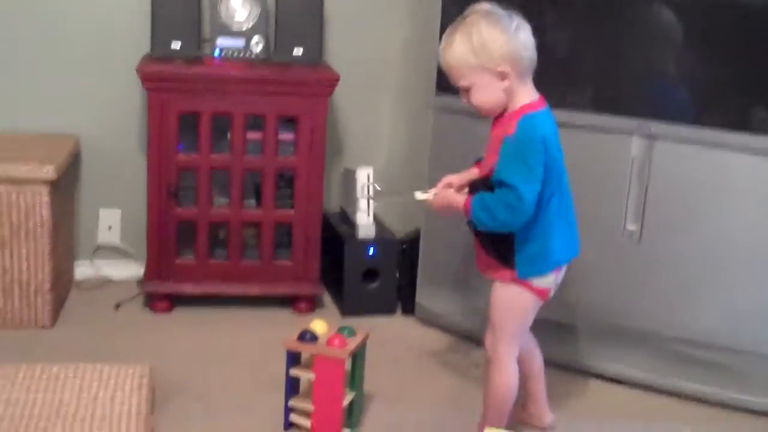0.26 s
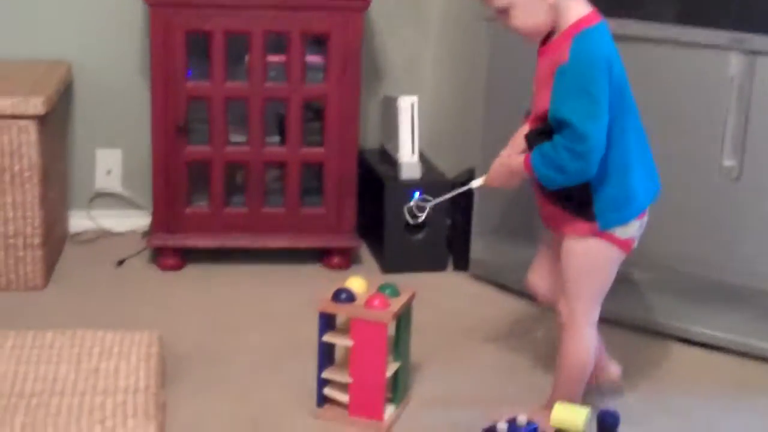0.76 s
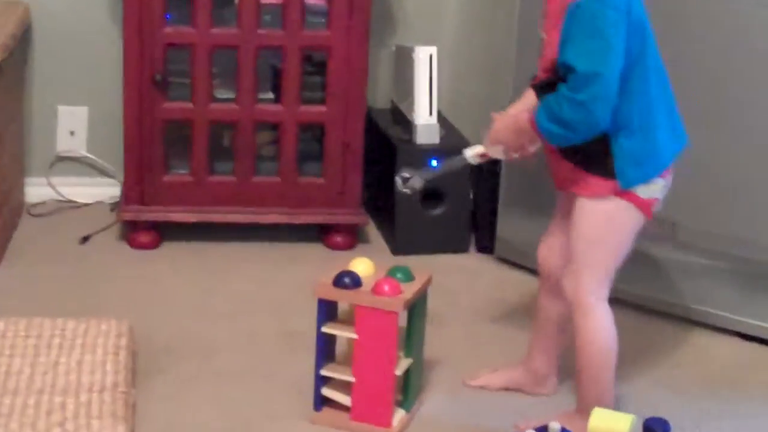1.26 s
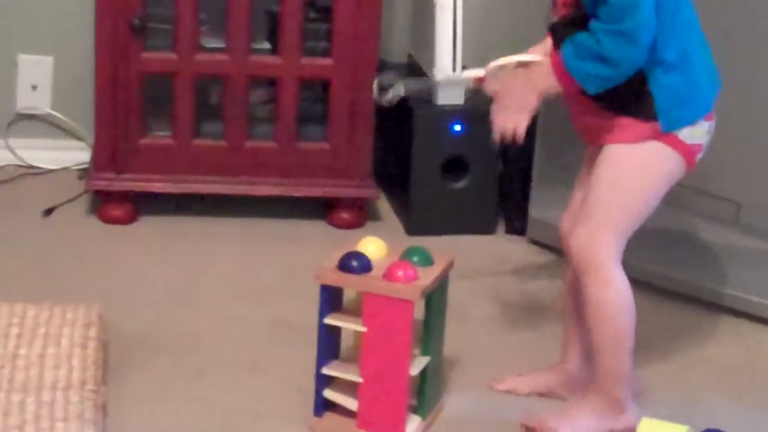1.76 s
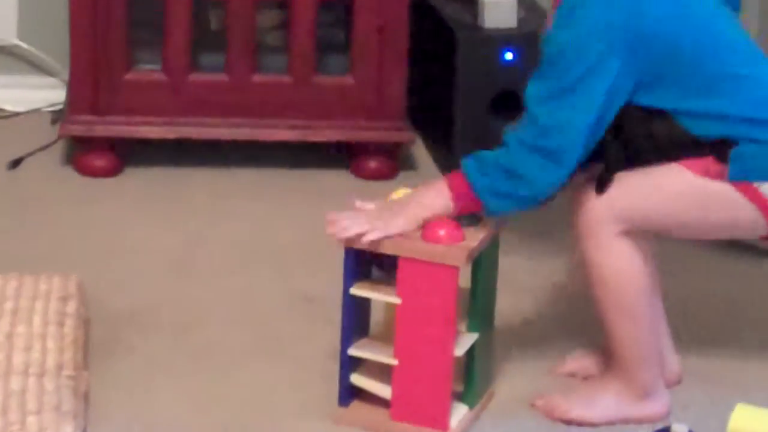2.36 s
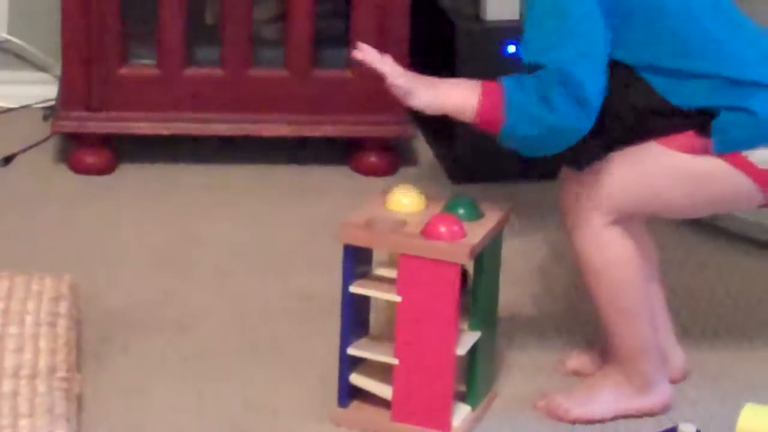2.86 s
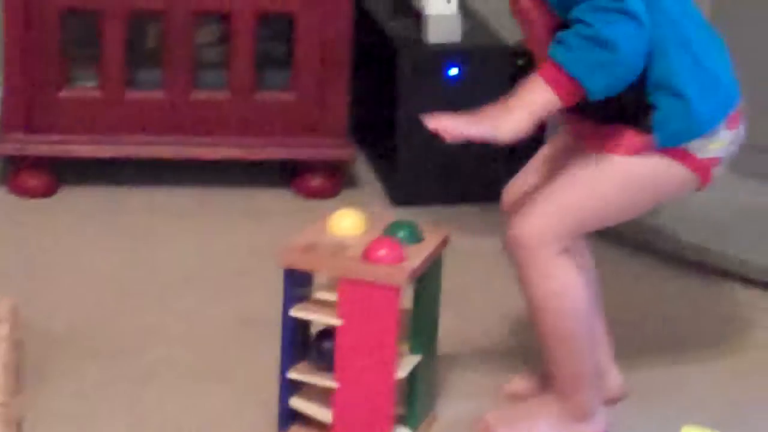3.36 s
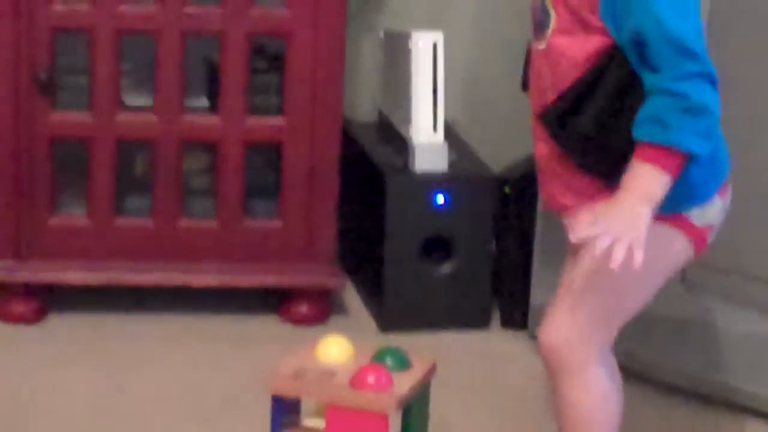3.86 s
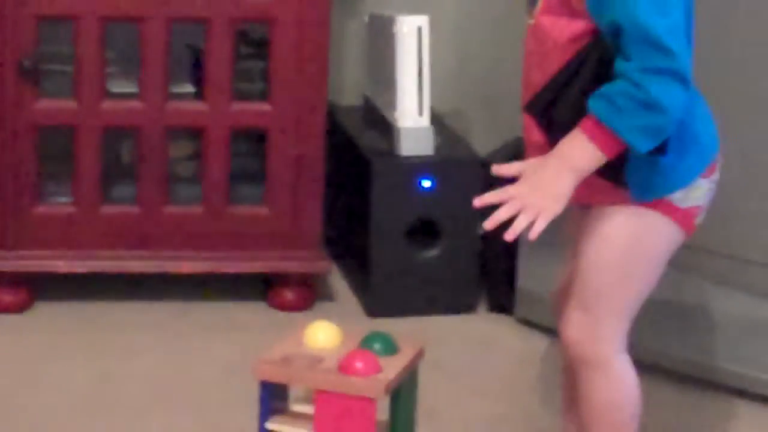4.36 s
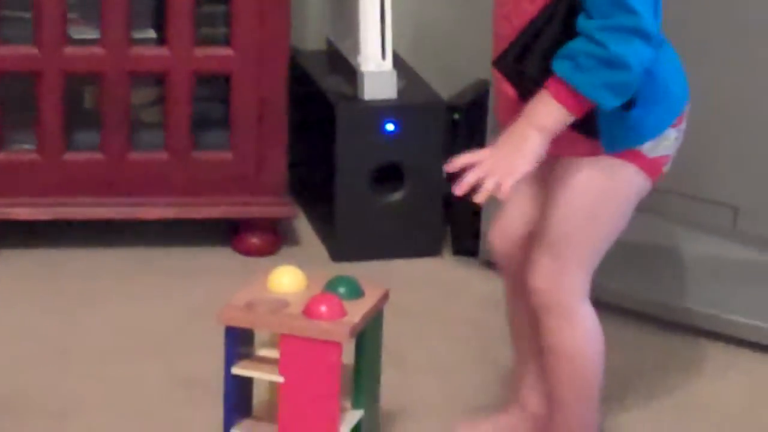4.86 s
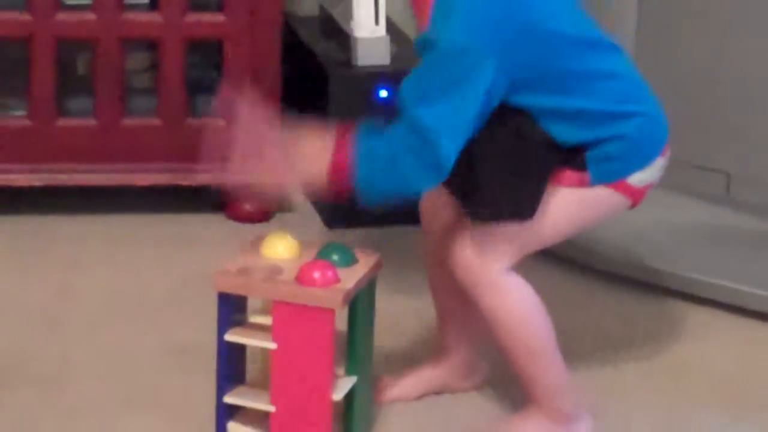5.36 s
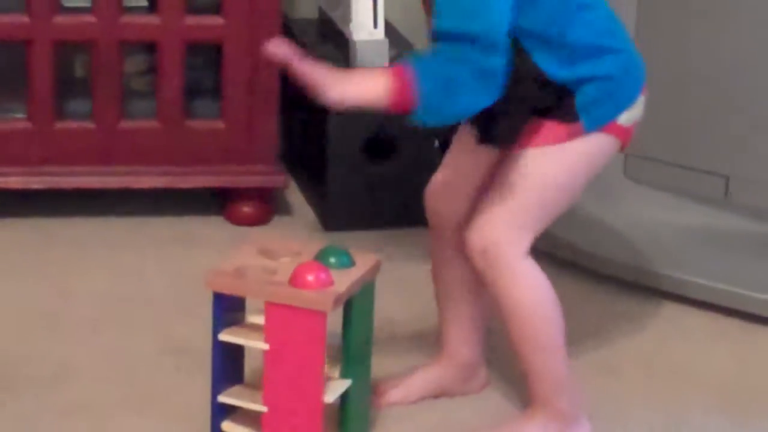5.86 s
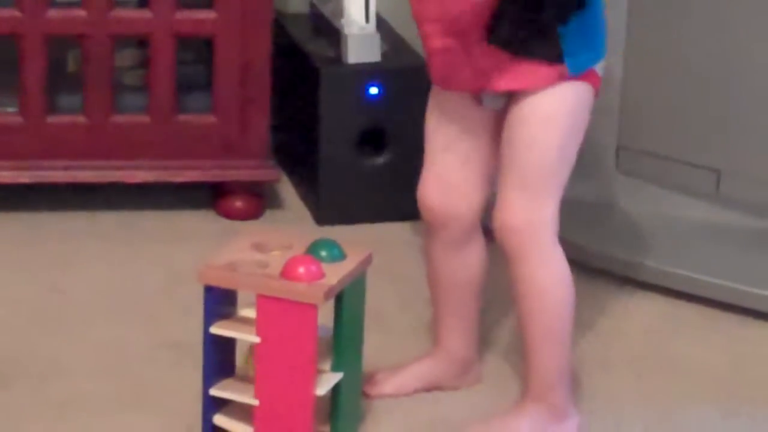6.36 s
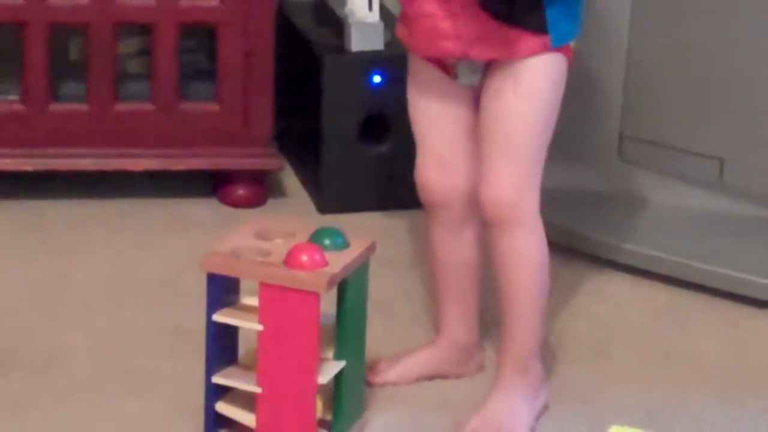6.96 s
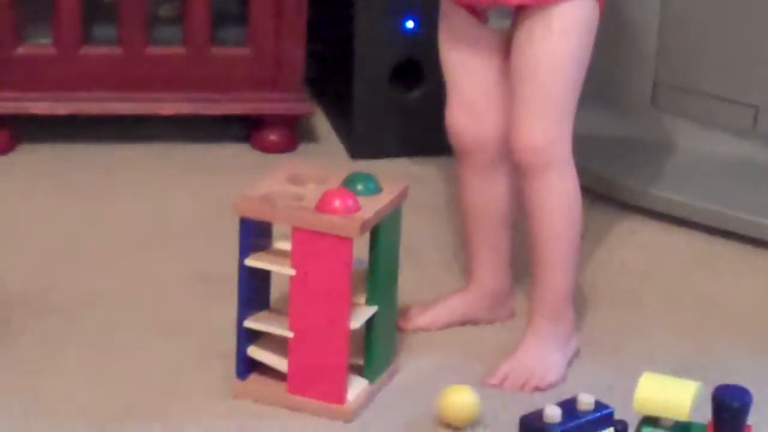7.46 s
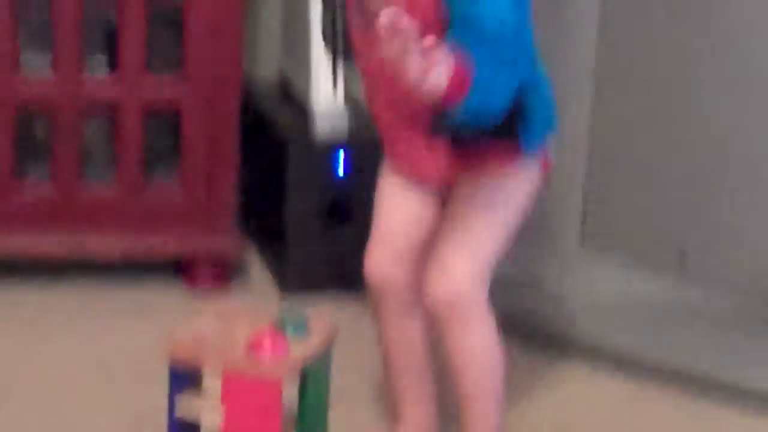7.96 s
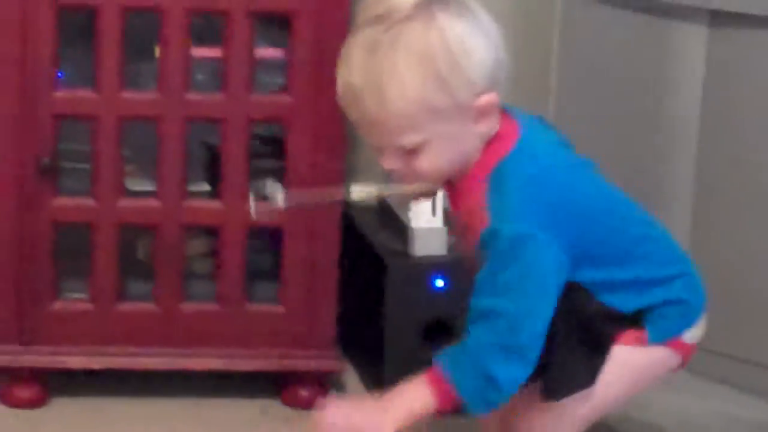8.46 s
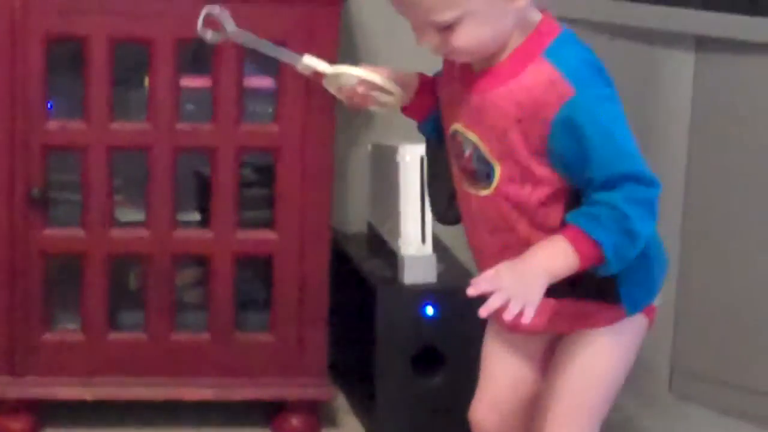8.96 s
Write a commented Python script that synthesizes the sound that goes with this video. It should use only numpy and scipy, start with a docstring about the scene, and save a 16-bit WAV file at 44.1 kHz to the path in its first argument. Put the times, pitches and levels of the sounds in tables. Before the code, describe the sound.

Quiet indoor noise and a small bright tong click open the scene. A loud hollow slap on wood follows, with dry wooden knocks, short rolls and clacks stepping down inside a small toy tower. Silence, then the same again, knocking at fairly regular steps. A last slap overlaps a metallic snap and trails off in light clacks. Close-to-mid handheld microphone, low bumps, short lively room ring.

```python
"""Over a soft background a small child in a living room snaps metal tongs, then slaps balls into a toy tower.
Each wooden ball knocks and bounces down the zigzag ramps inside, and the room rings briefly after it.
Tower and tongs are banks of decaying sines struck by rough clicks; small dull ticks make the balls roll.
Echoes and a banded noise tail make the room; shaped noise is the background, low sines are the bumps."""
import sys
import numpy as np
from scipy import signal
from scipy.fft import rfft, irfft
from scipy.io import wavfile

SR = 44100
rng = np.random.default_rng(int(sys.argv[2]) if len(sys.argv) > 2 else 0)


def wav_out(sig):
    """Save sig, one row per channel (or a flat mono array), as 16-bit PCM at SR to the path in sys.argv[1]."""
    wavfile.write(sys.argv[1], SR, np.round(np.clip(np.atleast_2d(sig).T, -1, 1) * 32767).astype(np.int16))


N = 406602

# ball and hand on the wooden tower, and near 7.86 s the ball bumping a toy on the carpet: # start_s [s],
# blow_db [dB], own_hz: pitch of the struck part [Hz], # then against the blow: thud_db of the frame, walls_db:
# clack of the side walls, # crack_db of the contact, own_db: the struck part's own ring [dB each]
KNOCKS = [(2.445, -23, 1550, -17, -6.5, -34, -15.5), (2.493, 5, 3010, -22.5, -1, -5, -25.5),
          (2.543, -2.5, 1670, -38.5, -3, -27, -19), (2.627, -7, 5730, -41, -12.5, -13.5, -14),
          (2.727, -17, 3200, -8, -12, -19, -7.5), (2.735, -14, 2000, -2.5, -13, -49, -6.5),
          (2.777, -31.5, 2030, -19, 2, -2, -6.5), (3.029, -6, 1790, -21, -4, -13.5, -17.5),
          (3.056, -22.5, 1980, 4.5, 8.5, -38, -18), (3.162, -48.5, 1160, -16, 12, -27, 11.5),
          (3.273, -11.5, 2780, -16, -12, -23, -5), (3.293, -14.5, 1110, -4.5, 0.5, -44, -32),
          (3.338, -19, 2280, 1.5, 1, -22, 5), (3.529, -3, 4770, -53.5, 4, -8.5, -9.5),
          (3.554, -23.5, 1065, 2, -12, -18, 7), (3.585, -6.5, 3660, -42, -6, -16, -11),
          (3.613, -23.5, 3820, -2, 13.5, -8, -4), (3.642, -28, 3320, -22, 5, -3, 14.5),
          (3.777, -16, 2080, -6.5, 2.5, -9, -6.5), (3.802, -10, 1080, -24, -7, -34, -6),
          (3.845, -24.5, 2080, -16, 4, -13.5, 0), (3.879, -16.5, 990, -36, 0, -14.5, -26),
          (4.083, -12.5, 1987, -57.5, 12, -1.5, 2), (4.111, -19.5, 1100, 0.5, -11, -12, -10.5),
          (4.133, -6.5, 2860, -23, -5.5, -20.5, -36), (4.332, -6.5, 2920, -14, -10, -17.5, 0),
          (4.356, -18, 1488, 1, -19, -30, 4), (4.397, -14.5, 1880, -42, 2, -12, -7.5),
          (4.413, -13, 2790, -7, -5, -26, -1.5), (5.554, -11.5, 1800, -8.5, -12, -13, -10),
          (5.592, 1.5, 3100, -15.5, 1, -3.5, -30.5), (5.638, -33, 3150, -3, 9, 4, -14),
          (5.678, -6, 4020, -14, 5, -19.5, -1), (5.777, -25, 1130, -12.5, 8.5, -11.5, 3),
          (5.834, -17, 2050, 1.5, -6, -50, 3.5), (5.863, -3.5, 2294, -40, -11, -12.5, -9),
          (5.995, -16.5, 2510, -8, -4.5, -14, 2.5), (6.014, -11.5, 1057, -7.5, -6, -25, -3.5),
          (6.062, -15.5, 1860, -22.5, -1, -23.5, -5), (6.292, -4.5, 1964, -49.5, 6.5, -8, -16),
          (6.319, -22.5, 1077, 1, -9, -25, 5.5), (6.353, -15, 1800, -42, 8, -7, -7),
          (6.386, -17.5, 3800, -28, 4.5, -8, -15), (6.411, -31.5, 3260, -17.5, 22, -7, 16),
          (6.547, -16, 2010, -10.5, 4, -9.5, -22), (6.572, -11.5, 1073, -5, -4, -18, -2),
          (6.608, -27.5, 2140, -25, 6.5, -18, 0), (6.653, -23.5, 2130, -18, -4.5, -20, -5),
          (6.831, -6.5, 2020, -44, 5, -8.5, -8), (6.859, -8, 1084, -9, -13.5, -7, -14.5),
          (6.888, -18.5, 3150, -18, 7, -7, -21), (6.914, -25, 3240, -22.5, 9, -19, 2),
          (7.125, -11, 2930, -16, -13, -19, -2), (7.137, -19.5, 1485, -24, -10, -40, 4.5),
          (7.148, -14.5, 1050, -4, -5.5, -21, -7), (7.189, -13, 1080, -21, 0.5, -16, -41),
          (7.856, -31, 2900, -18, -25, -58, -13), (7.885, -38, 2520, -13, -22, -58, -8),
          (8.411, -33.5, 2240, -43, -9, -11, -8), (8.421, -17, 2160, -9, -6, -11, -24),
          (8.448, -1.5, 2687, -7.5, 6.5, -7, -0.5), (8.47, -9, 3460, -5.5, 1, -4.5, 7.5),
          (8.558, -11, 2510, -54, -0.5, -4, -3), (8.666, -18, 2480, -7, -20, -60, 4.5),
          (8.787, -17, 3400, -5.5, 5, -13, -14), (8.819, -20, 3210, -17, 2, -15, -8),
          (8.976, -21, 3330, -9, 3, -8, -19), (9.005, -22, 1083, -5, -6, -23, -1),
          (9.027, -29.5, 2000, -4, 0, -20, -5), (9.08, -32, 3280, -21, -2.5, -20, -1.5)]


def from_db(db):
    """Gain of a level in dB."""
    return 10 ** (np.asarray(db) / 20)


def rms_one(x):
    """Scale a sound to unit power."""
    return x / np.sqrt(np.mean(x ** 2) + 1e-20)


def at_hz(table_hz, values, hz):
    """Read a curve drawn as straight lines on a log-frequency axis."""
    return np.interp(np.log(hz), np.log(table_hz), values)


def in_time(rows):
    """Draw a (time in s, value) curve at every sample."""
    return np.interp(np.arange(N) / SR, *np.transpose(rows))


def clicks(seconds, sizes):
    """Lay down one single-sample click for each blow."""
    train = np.full(N, 1e-18)  # a tiny offset keeps filters out of denormal numbers
    np.add.at(train, np.round(np.asarray(seconds) * SR).astype(int), sizes)
    return train


def place(seconds, shapes):
    """Lay down each blow's waveform at its time."""
    at = np.round(np.asarray(seconds) * SR).astype(int)[:, None] + np.arange(shapes.shape[1])
    return np.bincount(at.ravel(), shapes.ravel(), N + SR)[:N] + 1e-18


def ring(train, hz, t60):
    """Two-pole resonator: a unit click starts a decaying sine that loses 60 dB in t60 seconds."""
    radius = from_db(-60 / (t60 * SR))
    angle = 2 * np.pi * hz / SR
    return signal.lfilter([0, np.sin(angle)], [1, -2 * radius * np.cos(angle), radius * radius], train)


def chatter(rough, count):
    """Loose parts pass a click to and fro: three all-passes spread it in time but keep its colour."""
    longest_gap_s = 0.0014
    size = SR // 20
    first = 1 - np.reshape(rough, (-1, 1, 1))  # rough is the share that rebounds
    click = rfft(np.hanning(6)[1:-1] / 2.5, size)  # the blow takes a tenth of a millisecond
    gaps = longest_gap_s * SR * rng.uniform(.15, 1, (count, 3, 1))
    later = np.exp(-2j * np.pi * gaps.round() * np.arange(len(click)) / size)
    rebounds = (first - later) / (1 - first * later)
    return irfft(click * np.prod(rebounds, axis=1), size)


def bands(length, low_hz):
    """Third-octave bands of mid and side noise with their centre pitch."""
    edges = low_hz * 2 ** np.arange(0, np.log2(17000 / low_hz), 1 / 3)
    white = rng.standard_normal((2, 2, length))  # neighbouring bands use different noise
    for k, (low, high) in enumerate(zip(edges, edges[1:])):
        band = signal.butter(2, [low, high], "band", fs=SR, output="sos")
        yield np.sqrt(low * high), signal.sosfilt(band, white[k % 2])


def stereo(mid_side, alike):
    """Mix mid and side into left and right that agree by the given share."""
    alike = np.clip(alike, 0, 1)
    mid, side = mid_side
    return np.sqrt(1 + alike) * mid + np.sqrt(1 - alike) * side * [[1], [-1]]


def background():
    """Soft broad noise of the house and the microphone, built from bands; its level drifts."""
    # colour of the noise: band_hz [Hz], level_db [relative dB per Hz]
    colour = [(59, -35.5), (100, -12), (177, -2), (315, -1), (442, -6.5), (502, -5.5), (634, -14),
              (909, -7), (1250, -16.5), (5530, -21.5), (11100, -36), (13800, -45), (16000, -75)]
    # level over time, ahead of the left-right tilt: time_s [s], level_db [dB]
    drift = [(0.0, -50), (1.1, -49.5), (1.6, -54), (2.4, -53), (2.77, -55), (5.57, -53), (5.83, -57.5),
             (6.37, -54), (6.96, -57.5), (8.45, -55), (8.73, -67), (9.22, -63)]
    # left-right likeness: band_hz [Hz], alike [share 0-1]
    likeness = [(120, 1), (300, 0.98), (1000, 0.74), (4000, 0.069), (12000, 0.15)]
    hz, level_db = np.transpose(colour)
    like_hz, alike = np.transpose(likeness)
    noise = sum(from_db(at_hz(hz, level_db, f)) * stereo(pair, at_hz(like_hz, alike, f))
                for f, pair in bands(N, low_hz=92.5))
    tilt = from_db([[.8], [-.8]])  # a little stronger on the left
    return rms_one(noise) * from_db(in_time(drift)) * tilt


def rumble():
    """Lumpy low noise, its own at each microphone port; its level wanders through ten random points a second."""
    # level around which the lumps vary: time_s [s], level_db [dB]
    course = [(0.0, -53), (1.13, -61), (1.51, -66), (2.18, -54.5), (3.18, -70.5), (3.59, -59),
              (4.41, -67.5), (4.88, -58.5), (6.37, -49.5), (7.04, -65), (8.37, -60.5), (8.63, -62),
              (9.22, -67)]
    top_hz, lump_db = 93, 4.5
    band = signal.butter(3, [15, top_hz], "band", fs=SR, output="sos")
    low = signal.sosfilt(band, rng.standard_normal((2, N)))
    lumps = np.interp(np.arange(N) / SR * 10, np.arange(100), rng.standard_normal(100))
    return rms_one(low) * from_db(in_time(course) + lump_db * lumps)


def thumps():
    """Dull bumps on the microphone housing: decaying low sines, stronger on one side."""
    # start_s [s], level_db: mean of both sides' clicks [dB], pan_db: left over right [dB]
    bumps = [(1.889, -50, -29), (2.128, -49, -24), (4.773, -46, -13), (4.929, -44.5, -25.5),
             (6.111, -42.5, -22), (6.418, -35.5, 13)]
    pitch_hz, t60_s = 70, .09
    start_s, level_db, pan_db = np.transpose(bumps)
    return np.array([ring(clicks(start_s, from_db(level_db + side * pan_db / 2)), pitch_hz, t60_s)
                     for side in (1, -1)])


def room(x):
    """Direct sound, a few near echoes, then a diffuse noise tail that dies band by band."""
    # reflections off furniture and walls: delay_s [s], level_db [dB]
    wall_echoes = [(.0075, -20), (.012, -11), (0.0164, -24)]
    # tail: band_hz [Hz], t60_s [s], wet_db: against the direct sound, ahead of the early burst [dB],
    # alike: left-right likeness [share 0-1]
    tail_bands = [(483, 0.61, -7, 0.85), (1260, 0.52, -4.5, 1), (3240, 0.65, -10.5, 0.29),
                  (5000, 0.63, -14.5, 0.25), (8300, 0.43, -11, 0.081)]
    rise_s = 0.003
    early_db, early_s = -14, .02  # near surfaces add a dense first burst to the tail
    floor_echo = (.0042, -1.5)  # delay in s, level in dB
    left_db = 2  # left over right: the toy stands left of the microphone
    t = np.arange(SR) / SR
    hz, t60_s, wet_db, alike = np.transpose(tail_bands)
    tail = 0
    for f, pair in bands(SR, low_hz=164.3):
        decay_db = at_hz(hz, wet_db, f) - 60 * t / at_hz(hz, t60_s, f)
        tail = tail + stereo(pair, at_hz(hz, alike, f)) * from_db(decay_db)
    shape = (1 - np.exp(-t / rise_s)) * (1 + from_db(early_db) * np.exp(-t / early_s))
    response = tail * shape / np.sqrt(SR / 100)
    response[:, 0] += 1  # direct sound
    for k, (delay_s, echo_db) in enumerate([floor_echo] + wall_echoes):
        at = round(delay_s * SR)
        # echoes reach left and right first by turns, two samples apart
        response[[0, 1], [at + 2 * (k % 2), at + 2 * (1 - k % 2)]] += from_db(echo_db)
    return signal.fftconvolve(x[None], response, axes=1)[:, :N] * from_db([[left_db / 2], [-left_db / 2]])


def from_spots(x):
    """Each knock moves the sound to the next of four places, each with its own path through the room."""
    spots = 4
    knock_s = np.transpose(KNOCKS)[0]
    spot = np.searchsorted(knock_s, np.arange(N) / SR) % spots
    return sum(room(x * (spot == k)) for k in range(spots))


def tongs():
    """The steel tips meet: a rough click rings short bright modes."""
    # start_s [s], level_db: strength of the click [dB]
    snaps = [(0.849, -53), (1.2894, -21), (8.557, -15)]
    # modes of the tongs: mode_hz [Hz], mode_db [dB], t60_s [s]
    steel_modes = [(2000, 0, 0.0019), (2930, -3, 0.0062), (3770, 4, 0.0057), (4300, 6, 0.013),
                   (4740, 8, 0.0045), (5940, 11, 0.0013), (7020, 2.5, 0.02), (6370, -2, 0.0069),
                   (7320, 2, 0.014), (8300, 3, 0.0071), (8930, 4, 0.017), (9500, 1, 0.012),
                   (10770, 3.5, 0.0088), (11050, 14.5, 0.0034)]
    start_s, level_db = np.transpose(snaps)
    snap = place(start_s, from_db(level_db)[:, None] * chatter(rough=0.07, count=len(start_s)))
    rings = sum((-1) ** k * from_db(mode_db) * ring(snap, hz, t60)
                for k, (hz, mode_db, t60) in enumerate(steel_modes))
    return signal.sosfilt(signal.butter(4, 1500, "high", fs=SR, output="sos"), rings)


def palm():
    """Each slap of the palm gives a short low push and the hollow pop of the cupped air."""
    # start_s [s], push_db: low push [dB], cup_db: hollow cup [dB], cup_hz: cup pitch [Hz]
    slaps = [(2.493, -46, -38, 400), (5.595, -53, -21, 636), (8.449, -48, -24, 520)]
    push_hz, push_t60_s, cup_t60_s = 165.7, 0.033, 0.016
    out = 0
    for start_s, push_db, cup_db, cup_hz in slaps:
        push = ring(clicks([start_s], from_db(push_db)), push_hz, push_t60_s)
        pop = ring(clicks([start_s], from_db(cup_db)), cup_hz, cup_t60_s)
        out = out + push + pop
    return out


def roll_level():
    """A ball lands on a ramp and rolls: the level swells after the landing, then fades as it slows."""
    # start_s [s], top_db: tick level at its loudest [dB]
    rolls = [(2.63, -48.5), (3.03, -50.5), (3.278, -45.5), (3.78, -49), (4.33, -43.5), (5.78, -30),
             (5.999, -49), (6.55, -46), (8.561, -47)]
    swell_s, fade_db_per_s, start_db = 0.26, 74, -31  # start_db is against the loudest point
    start_s, top_db = np.transpose(rolls)[:, :, None]
    since = np.arange(0, N, 64) / SR - start_s  # one value for every 64 samples
    shape_db = np.minimum(start_db * (1 - since / swell_s), -fade_db_per_s * (since - swell_s))
    loudest = np.max(from_db(top_db + shape_db) * (since > 0), axis=0)
    return np.repeat(loudest, 64)[:N]


def tower():
    """Knocks strike all wooden modes, each with a slightly new strength; rolling feeds them dull ticks."""
    # where the blow's parts are heard: part_hz [Hz] of frame, ramps, side walls, crack
    part_hz = [1000, 2000, 4700, 8500]
    # modes of the tower: mode_hz [Hz], mode_db [dB]
    wood_modes = [(620, -11.5), (760, -9), (950, -3.5), (1090, -1.5), (1280, -6), (1480, -4.5),
                  (1750, -5.5), (1950, -3), (2100, -0.5), (2330, -4.5), (2550, -6.5), (2850, -4.5),
                  (3150, 1.5), (3400, 3.5), (3800, 1.5), (4300, 4), (4650, 6), (5050, 5.5), (5800, 3),
                  (6800, 4.5), (7700, 8.5), (8650, 11.5), (9800, 12.5), (11000, 8.5)]
    ramps_db = 0.5  # the ramps ring at a steady share of every blow
    spread_db = 1.5  # random difference from blow to blow
    wood_rough, hard_rough, hard_from_db = 0.08, 0.2, -3  # the hardest blows shake the whole tower loose
    wood_cycles, own_cycles = 16, 38  # cycles to lose 60 dB: modes, struck part's own ring
    struck_db, struck_octaves = 4.5, 0.15  # modes near the struck part's own pitch ring louder
    ticks_per_s, roll_dull_hz = 140, 3100
    radiates_from_hz = 712  # small wooden parts send out no bass

    start_s, blow_db, own_hz, thud_db, walls_db, crack_db, own_db = np.transpose(KNOCKS)
    count = len(start_s)
    signs = (-1) ** np.arange(len(wood_modes))  # neighbouring modes move in opposite sense
    spread = from_db(spread_db * rng.standard_normal((count, len(wood_modes)))) * signs
    shapes = chatter(np.where(blow_db > hard_from_db, hard_rough, wood_rough), count)
    ticks = (rng.random(N) < ticks_per_s / SR) * rng.standard_normal(N) * roll_level()

    own = [from_db(db) * ring(shape, hz, own_cycles / hz)
           for db, hz, shape in zip(blow_db + own_db, own_hz, shapes)]
    out = place(start_s, np.array(own))
    for k, (hz, mode_db) in enumerate(wood_modes):
        part_db = np.array([at_hz(part_hz, [thud, ramps_db, walls, crack], hz)
                            for thud, walls, crack in zip(thud_db, walls_db, crack_db)])
        near_db = struck_db * np.exp(-(np.log2(hz / own_hz) / struck_octaves) ** 2)
        strength = from_db(blow_db + part_db + near_db) * spread[:, k]
        blows = place(start_s, shapes * strength[:, None])
        rolling = ticks / (1 + (hz / roll_dull_hz) ** 2) * (-1) ** k
        out += from_db(mode_db) * ring(blows + rolling, hz, wood_cycles / hz)
    return signal.sosfilt(signal.butter(3, radiates_from_hz, "high", fs=SR, output="sos"), out)


def scene():
    """Toy, palm and tongs in the room over background, rumble and bumps."""
    return from_spots(tower() + palm() + tongs()) + background() + rumble() + thumps()


def record(dry):
    """The microphone fades in the treble, peaks are rounded, the top is cut."""
    mic_top_hz, cutoff_hz = 13900, 16100  # from cutoff_hz up the last filter takes away 90 dB
    ceiling = 1.0
    heard = signal.sosfilt(signal.butter(4, mic_top_hz, fs=SR, output="sos"), dry)
    limited = heard / (1 + np.abs(heard / ceiling) ** 4) ** .25
    return signal.sosfilt(signal.cheby2(12, 90, cutoff_hz, fs=SR, output="sos"), limited)


dry = scene()
out = record(dry)
wav_out(out)
```